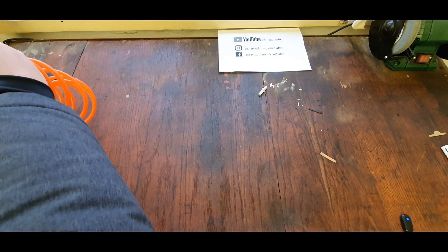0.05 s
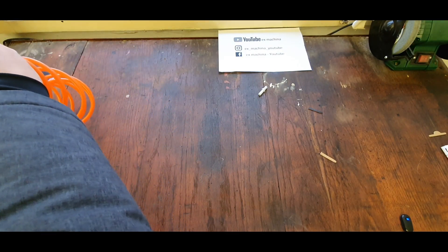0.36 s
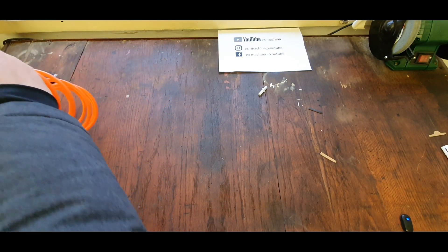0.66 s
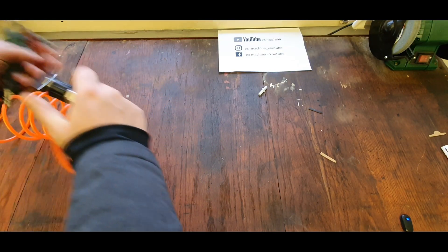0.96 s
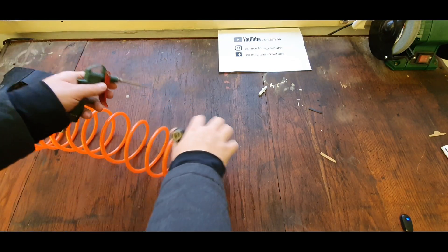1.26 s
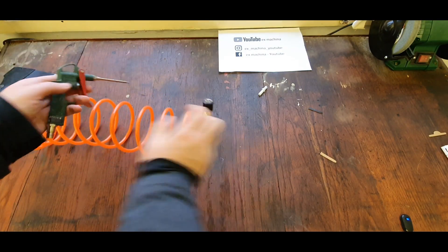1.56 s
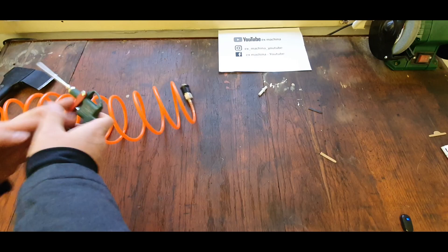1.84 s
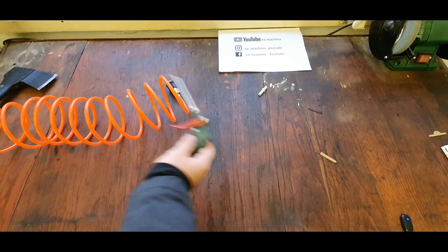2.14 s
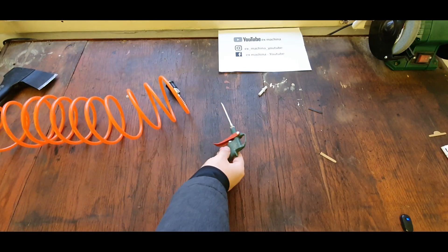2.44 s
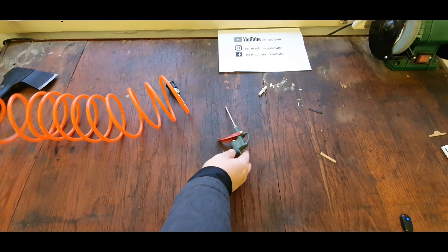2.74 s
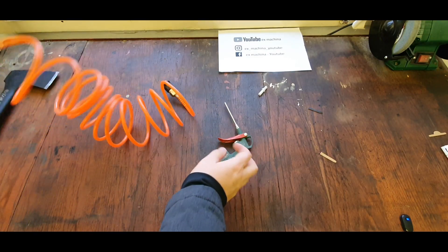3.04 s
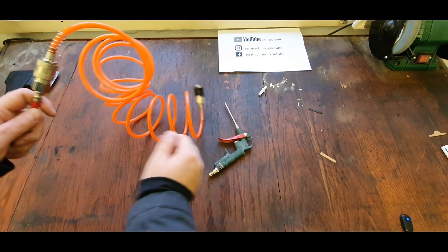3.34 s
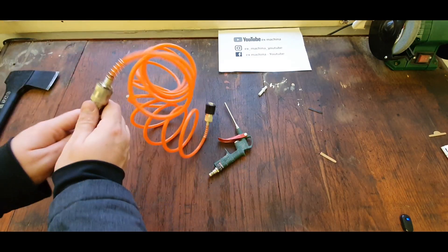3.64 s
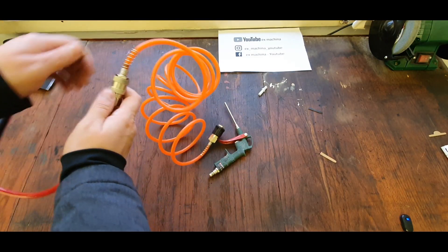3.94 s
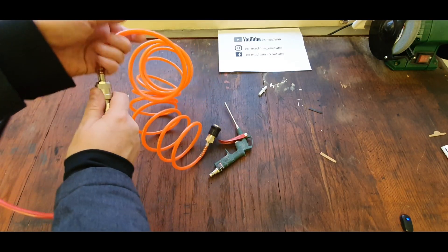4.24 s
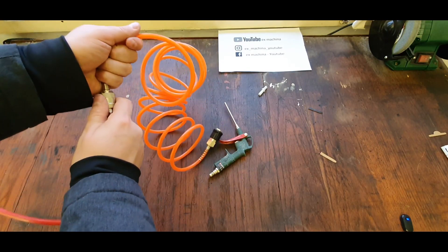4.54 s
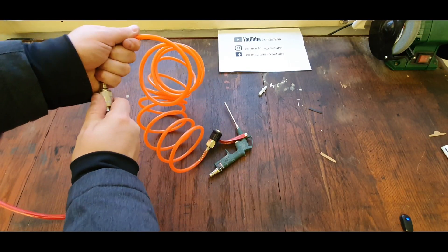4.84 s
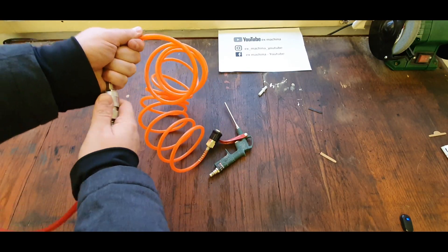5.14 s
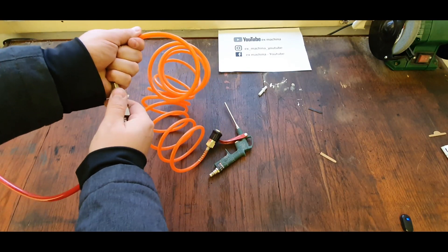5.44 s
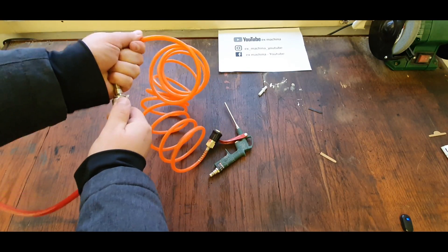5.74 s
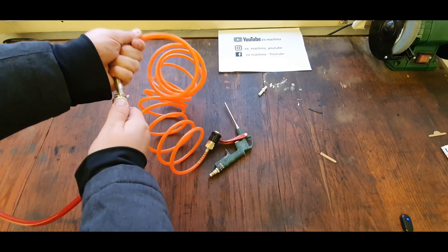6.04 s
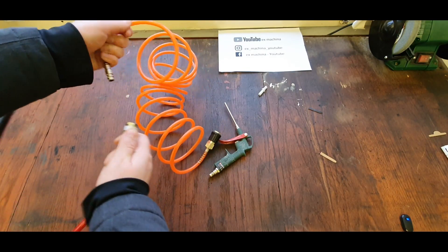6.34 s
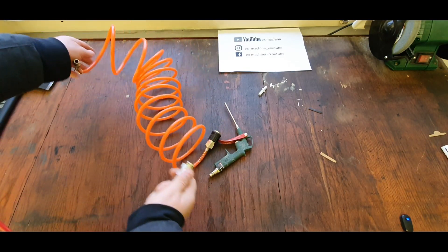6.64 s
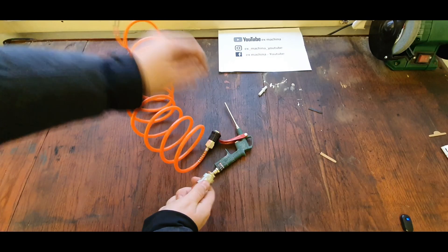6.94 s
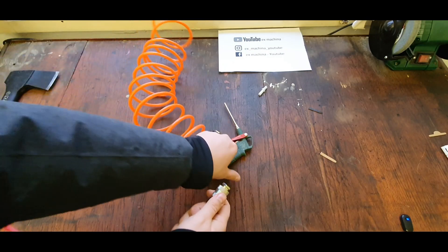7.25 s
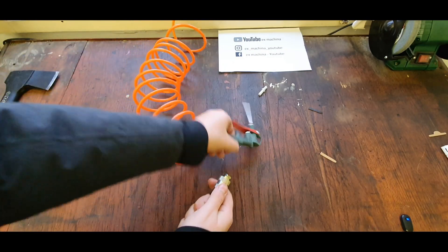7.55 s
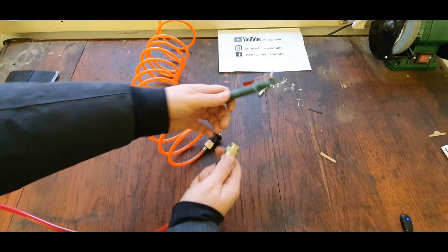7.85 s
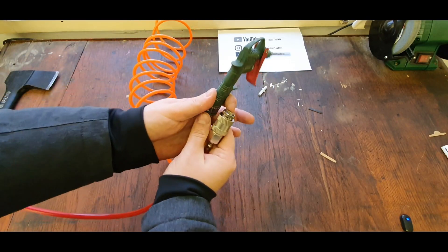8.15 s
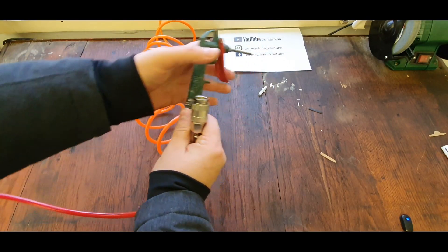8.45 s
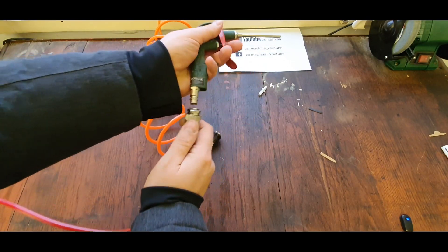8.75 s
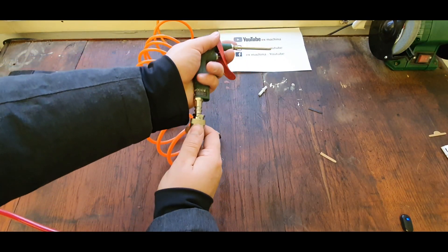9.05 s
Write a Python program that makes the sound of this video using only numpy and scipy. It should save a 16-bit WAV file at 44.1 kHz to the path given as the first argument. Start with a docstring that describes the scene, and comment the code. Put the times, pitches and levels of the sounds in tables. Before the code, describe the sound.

A short air hiss, a tool and hose knocking on wood, a sudden blast from an uncoupled air line, then small metallic clicks.

```python
"""A blow gun hisses and shuts, then is laid down with its coiled air hose on a wooden workbench.
Each knock is a low thump, a woody ring and a metal clack; the hose rumbles, scrapes and squeaks.
A brass quick coupler is pulled apart with a burst of turbulent air, then the gun is dragged up and
its steel plug rattles into the coupler. A faint hiss swells and sinks; the workshop is small and live."""
import sys
import numpy as np
from scipy import signal
from scipy.fft import rfft, irfft, next_fast_len
from scipy.io import wavfile
from scipy.ndimage import uniform_filter1d

SR = 44100
rng = np.random.default_rng(int(sys.argv[2]) if len(sys.argv) > 2 else 0)


def transcribe(signal):
    """Save signal, clipped to [-1, 1], as a 16-bit WAV file at the path in sys.argv[1]."""
    frames = np.atleast_2d(signal).T
    limited = np.clip(frames, -1, 1)
    pcm = np.round(limited * 32767).astype(np.int16)
    wavfile.write(sys.argv[1], SR, pcm)


N = 405279
TIME = np.arange(N) / SR
AGE = np.arange(SR * 3 // 4) / SR  # seconds since a hit

# knocks of gun, hose and fittings, including the valve shutting and the coupler popping open:
# start_s, level_db, weight_db, hardness_db
# weight lifts the thump; hardness lifts the clack, and the tick and snap twice as far
KNOCK_HITS = [(0.351, -34.5, -11, 3.5), (0.988, -54, 2, 1.5), (1.076, -45.5, -1.5, 1.5),
              (1.207, -48.5, 4, 2.5), (1.309, -40.5, -3, -1.5), (1.67, -20.5, -6.5, -11.5),
              (1.726, -32.5, -1, -3), (1.862, -33.5, -15, -17), (1.975, -36, -4, -20.5),
              (2.455, -35.5, -17, 2), (2.478, -38.5, -0.5, 3.5), (2.538, -40.5, -0.5, 0),
              (2.704, -32, -9.5, -11.5), (2.804, -23.5, -20, -13), (2.816, -13, -6, -1.5),
              (2.834, -35, -9, 7.5), (3.048, -10.5, -6.5, -6), (3.058, -16, -11, -10.5),
              (3.119, -22, 6, -1.5), (3.169, -19.5, -10, -7.5), (3.767, -33.5, 0.5, 1),
              (4.303, -29.5, -7, -15.5), (4.517, -46.5, -4.5, -6.5), (5.351, -61, -2, -1.5),
              (5.602, -27.5, -15.5, 4), (6.285, -57, -4, -8), (6.455, -54, 3.5, -17.5),
              (6.544, -52, 2, -5.5), (6.897, -46.5, 1, -1), (6.941, -34, -8, 2), (7.418, -35.5, -3.5, 4.5),
              (7.587, -55.5, 0.5, 9), (7.637, -36, -6.5, -25), (7.993, -49.5, -3, -6)]
# the bright snap on top of a knock or click: freq_hz, level_db
SNAP_SPECTRUM = [(5000, -34), (8000, -3), (10800, -4), (12800, 3.5), (16000, -5.5)]


def amp(db):
    """Decibels to gain."""
    return 10 ** (np.asarray(db) / 20)


def unit(x):
    """Scale to rms 1."""
    return x / np.sqrt(np.mean(x ** 2) + 1e-20)


def struck(x, size=900):
    """Scale a hit so that its first size samples have rms 1."""
    return x / np.sqrt(np.mean(x[..., :size] ** 2))


def placed(x, pan_db):
    """Pan a stereo sound: positive is left, negative is right."""
    return x * amp([[pan_db / 2], [-pan_db / 2]])


def add(track, start_s, sound):
    """Mix a sound into a stereo track."""
    start = max(round(start_s * SR), 0)
    track[:, start:start + sound.shape[-1]] += sound[..., :N - start]


def along(points, hz):
    """Read a curve of (freq_hz, value) points on a log frequency axis."""
    freqs, values = np.transpose(points)
    return np.interp(np.log(hz + 1), np.log(freqs + 1), values)


def filtered(x, response):
    """EQ x with a gain given as a function of frequency."""
    padded = next_fast_len(x.shape[-1] + SR // 10)
    gain = response(np.fft.rfftfreq(padded, 1 / SR))
    return irfft(rfft(x, padded) * gain, padded)[..., :x.shape[-1]]


def colour(x, spectrum):
    """Minimum-phase EQ through (freq_hz, level_db) points, returned at rms 1."""
    size = x.shape[-1]
    padded = 2 * next_fast_len(size // 2 + SR // 10)
    gain = amp(along(spectrum, np.fft.rfftfreq(padded, 1 / SR)))
    cepstrum = irfft(np.log(gain))
    cepstrum[1:padded // 2] *= 2  # folded forward, so nothing rings ahead of a hit
    cepstrum[padded // 2 + 1:] = 0
    return unit(irfft(rfft(x, padded) * np.exp(rfft(cepstrum)), padded)[..., :size])


def fade(t60_s):
    """Free decay after a hit."""
    return 10 ** (-3 * AGE / t60_s)


def stroke(start_s, length_s, attack_s, release_s):
    """Envelope of one movement: it builds, holds and dies away."""
    age = TIME - start_s
    return np.clip(age / attack_s, 0, 1) * np.exp(-np.maximum(age - length_s, 0) / release_s)


def dying(start_s, db, db_per_s):
    """Envelope that jumps to db and falls at a steady rate."""
    age = TIME - start_s
    return (age >= 0) * amp(db - db_per_s * np.abs(age))


def ring(modes, scatter_db):
    """A body struck at a new spot: each mode gets a new strength and sign."""
    out = np.zeros(len(AGE))
    for hz, db, t60_s in modes:
        strength = rng.choice([-1, 1]) * amp(db + scatter_db * rng.standard_normal())
        out += strength * fade(t60_s) * np.sin(2 * np.pi * hz * AGE)
    return out


def burst(spectrum, t60_s, chatter_db):
    """One sharp contact and the chatter after it, coloured by the struck body."""
    chatter = rng.standard_normal(len(AGE)) * fade(t60_s)
    force = amp(chatter_db) * chatter / np.linalg.norm(chatter)
    force[0] += 1
    return colour(force, spectrum)


def slips(per_s, spread_db):
    """Stick-slip friction: tiny pushes of uneven size at random moments."""
    pushes = (rng.random(N) < per_s / SR) * rng.choice([-1, 1], N)
    return pushes * amp(spread_db * rng.standard_normal(N))


def diffuse(size):
    """White stereo noise from all sides: centred in the bass, wide in the treble."""
    # how alike left and right are in the room: freq_hz, correlation
    likeness = [(60, 0.98), (140, 0.97), (290, 0.9), (640, 0), (1400, 0), (5000, 0.017)]

    def mid_side_gains(hz):
        angle = np.arccos(np.clip(along(likeness, hz), -1, 1)) / 2
        return np.array([np.cos(angle), np.sin(angle)])

    mid, side = filtered(rng.standard_normal((2, size)), mid_side_gains)
    return np.array([mid + side, mid - side])


def workshop(x, wet_db, right_lag_samples=8):
    """Mono to stereo: the direct sound, the bounce off the bench and the room's dense tail."""
    # the room's reverb time: freq_hz, t60_s
    decay_times = [(100, 0.28), (300, 0.31), (700, 0.38), (1800, 0.41), (5000, 0.36), (9000, 0.33),
                   (15000, 0.32)]
    hz, t, bands = signal.stft(diffuse(len(AGE)), SR, nperseg=256)
    decay = amp(-60 * t / along(decay_times, hz)[:, None])
    tail = signal.istft(bands * decay, SR, nperseg=256)[1][:, :len(AGE)]
    tail *= 1 + 2.2 * np.exp(-AGE / 0.0011)  # the bench bounce
    paths = amp(wet_db) * tail / np.linalg.norm(tail[0])
    paths[0, 0] += 1
    paths[1, right_lag_samples] += 1
    return signal.fftconvolve(x[None], paths, axes=1)[:, :len(x)]


def room_tone_and_hiss():
    """A faint hiss swells and sinks, brighter when louder, over the rumble of the still room."""
    # hiss swells: peak_s, half_length_s, level_db
    hiss_swells = [(0.778, 0.28, -58.5), (1.19, 0.1, -52), (1.586, 0.16, -50.5), (1.867, 0.24, -56),
                   (2.32, 0.25, -53.5), (2.884, 0.3, -57), (3.548, 0.36, -57.5), (3.93, 0.19, -52.5),
                   (4.2, 0.25, -58), (4.933, 0.14, -64), (6.55, 0.13, -67), (7.28, 0.44, -64.5),
                   (7.85, 0.24, -60.5), (8.58, 0.08, -61.5)]
    # the hiss: freq_hz, level_db
    hiss_spectrum = [(200, -3), (600, -1.5), (2000, -1), (3100, 3.5), (4500, 0), (8200, 5.5), (9000, -2.5),
                     (16000, 0.5)]
    # the still room: freq_hz, level_db
    room_spectrum = [(15, -36), (25, -6), (70, -7), (153, -14), (714, -18.5), (962, -21.5), (1650, -18),
                     (2220, -28.5), (8140, -35.5), (16000, -39.5)]
    bright_spectrum = [(1000, -11), (3000, -5.5), (8000, 0), (9500, -3), (14000, 1.5)]
    bright_db = -48.5  # a swell this loud is half bright hiss
    swells = (amp(db) * np.exp(-((TIME - peak_s) / half_s) ** 2) for peak_s, half_s, db in hiss_swells)
    envelope = np.sqrt(sum(swell ** 2 for swell in swells))
    hiss = np.hypot(envelope, amp(-67.5)) * colour(diffuse(N), hiss_spectrum)
    bright_hiss = envelope ** 2 / amp(bright_db) * colour(diffuse(N), bright_spectrum)
    return hiss + bright_hiss + amp(-68) * colour(diffuse(N), room_spectrum)


def coil_rumble():
    """The springy coil rumbles on the bench while it is moved, and swings on after every knock."""
    # hands moving the hose: start_s, length_s, level_db
    moves = [(1.03, 0.87, -53.5), (2.115, 0.6, -59), (3.422, 0.12, -66), (3.663, 0.81, -51.5),
             (4.5, 0.73, -65), (6.397, 0.33, -62), (6.9, 0.65, -52.5)]
    # the coil on the bench: freq_hz, level_db
    rumble_spectrum = [(25, -28), (45, -13), (62, 2), (72, 0.5), (82, -13.5), (115, 4.5), (150, -1.5),
                       (185, -24.5), (225, -6.5), (290, -12), (400, -14.5), (700, -20.5), (1500, -25.5),
                       (4000, -53)]
    swing_db, swing_fall_db_per_s, rest_db = -13.5, 53.5, -75
    jolts = np.zeros(N)
    for start_s, db, weight_db, _ in KNOCK_HITS:
        jolts[round(start_s * SR)] = amp(db + weight_db + swing_db) ** 2
    swing_power = signal.lfilter([1], [1, -amp(-swing_fall_db_per_s / SR) ** 2], jolts)
    move_power = sum((amp(db) * stroke(start_s, length_s, attack_s=0.068, release_s=0.1)) ** 2
                     for start_s, length_s, db in moves)
    return np.sqrt(swing_power + move_power + amp(rest_db) ** 2) * colour(diffuse(N), rumble_spectrum)


def squeaks():
    """Rubbing hose and metal sing thin, wavering tones that sag as the rub slows."""
    # squeaking rubs: start_s, length_s, pitch_hz, level_db
    rubs = [(0.855, 0.021, 3150, -64), (1.243, 0.027, 1120, -51.5), (8.934, 0.062, 8220, -69.5)]
    sag_per_s, waver_depth = 0.48, 0.009  # shares of the pitch
    out = np.zeros(N)
    for start_s, length_s, hz, db in rubs:
        waver = waver_depth * unit(uniform_filter1d(rng.standard_normal(N), size=100))
        pitch_hz = hz * (np.exp(-sag_per_s * np.maximum(TIME - start_s, 0)) + waver)
        envelope = amp(db) * stroke(start_s, length_s, attack_s=0.017, release_s=0.01)
        out += envelope * np.sin(2 * np.pi * np.cumsum(pitch_hz) / SR)
    return workshop(out, wet_db=7)


def sliding():
    """Hose and gun judder over the boards, and their hard edges scrape."""
    # drags across the wood: start_s, length_s, judder_db, scrape_db
    drags = [(0.802, 0.14, -52, -61), (1.067, 0.27, -46.5, -44.5), (2.403, 0.03, -57, -60),
             (2.442, 0.05, -53, -33), (2.668, 0.05, -32, -56), (3.052, 0.13, -21, -37),
             (6.253, 0.99, -63.5, -73), (6.969, 0.11, -44, -54), (7.255, 0.084, -25, -45),
             (7.446, 0.13, -42, -36), (8.396, 0.57, -64.5, -79)]
    judder_spectrum = [(120, -31), (200, -14.5), (280, -0.5), (420, -6), (560, -10), (680, -4),
                       (1000, -15.5), (2500, -37), (5000, -57)]
    scrape_spectrum = [(600, -18), (1200, -0.5), (2000, 1.5), (3500, -6), (7000, -20.5), (12000, -26)]
    judder = colour(slips(per_s=630, spread_db=2.5), judder_spectrum)
    scrape = colour(slips(per_s=5300, spread_db=9), scrape_spectrum)
    out = np.zeros(N)
    for start_s, length_s, judder_db, scrape_db in drags:
        envelope = stroke(start_s, length_s, attack_s=0.051, release_s=0.028)
        out += envelope * (amp(judder_db) * judder + amp(scrape_db) * scrape)
    return amp(-10) * workshop(out, wet_db=3.5)


def plug_and_socket():
    """The hollow steel plug rings on the brass socket; pulling the sleeve and pushing the plug grind."""
    # the plug touching the socket: start_s, plug_db, sleeve_db
    clinks = [(5.6096, -24, -20.5), (6.942, -32, -35), (8.7023, -31, -23.5), (8.7151, -36, -45),
              (8.8884, -33, -55), (8.961, -38.5, -56), (8.976, -51.5, -61), (9.0238, -48.5, -52.5),
              (9.0758, -40, -45), (9.0915, -39, -42), (9.1, -35.5, -48.5), (9.124, -32.5, -38.5)]
    # the plug's ring: pitch_hz, level_db, t60_s
    plug_modes = [(1910, -15, 0.15), (2900, -5, 0.11), (3030, -11, 0.086), (3120, -5, 0.17),
                  (3280, -1, 0.14), (3070, -7.5, 0.13)]
    # contact with the socket: freq_hz, level_db
    socket_spectrum = [(700, -40.5), (1400, -27.5), (1580, -19), (2100, -20), (2750, -4.5), (3050, 9),
                       (3350, -9.5), (4000, -20.5), (6000, -46.5)]
    # the coupler's brighter sleeve: freq_hz, level_db
    sleeve_spectrum = [(2500, -41.5), (4300, -5.5), (4820, -3.5), (5200, -3), (5700, 4), (6500, -6),
                       (7400, -5), (8500, -16.5), (12000, -24)]
    pull_spectrum = [(1200, -11.5), (3000, 3), (4500, -6), (6500, -10), (10000, -19.5)]
    out = np.zeros((2, N))
    for start_s, plug_db, sleeve_db in clinks:
        steel = amp(-9.5) * struck(ring(plug_modes, scatter_db=6.5))
        steel += struck(burst(socket_spectrum, t60_s=0.015, chatter_db=-7.5))
        plug = amp(plug_db - 2) * struck(workshop(steel, wet_db=-2.5))
        brass = burst(sleeve_spectrum, t60_s=0.013, chatter_db=2.5)
        sleeve = amp(sleeve_db - 11.5) * struck(workshop(brass, wet_db=-2.5))
        add(out, start_s, placed(plug + sleeve, pan_db=-2.5))
    rub = slips(per_s=400, spread_db=6)
    push_grit = colour(rub, socket_spectrum) + amp(-11) * colour(rub, sleeve_spectrum)
    pull_grit = colour(slips(per_s=1800, spread_db=5.5), pull_spectrum)
    sleeve_pull = amp(-58) * stroke(start_s=4.485, length_s=0.0444, attack_s=0.0059, release_s=0.055)
    plug_push = amp(-43.5) * stroke(start_s=9.08, length_s=0.053, attack_s=0.034, release_s=0.016)
    return out + workshop(sleeve_pull * pull_grit + plug_push * push_grit, wet_db=4.5)


def metal_clicks():
    """Sprung sleeve, locking balls and trigger snap on metal; bright clicks trade tick for snap."""
    # small parts in the coupler and gun: start_s, level_db, brightness_db
    clicks = [(1.942, -49.5, 4), (2.48, -40, 6), (2.8165, -23, 18), (2.826, -33, 16), (2.857, -41, 16),
              (3.048, -19.5, -5), (3.177, -36.5, 14), (3.768, -37.5, 5), (4.6543, -46, 2.5),
              (4.767, -57.5, -0.5), (6.003, -48.5, 1), (6.0175, -33, 13), (6.0291, -47, 14),
              (6.042, -48, 13), (6.124, -64, 1), (7.4185, -36, -3), (7.589, -34, 5), (8.0485, -48, -3),
              (8.3817, -44.5, -2), (8.3914, -49, 12), (8.4533, -48, 2), (8.4654, -47.5, 13.5),
              (8.684, -36, 14)]
    # the dull part of a click: freq_hz, level_db
    tick_spectrum = [(600, -14), (1500, -8.5), (3000, -0.5), (4500, -4), (7000, -25)]
    # the bright part of a click: freq_hz, level_db
    sleeve_spectrum = [(3000, -30.5), (5000, -5.5), (6000, -1), (7400, 0), (8600, -10.5), (12000, -27.5)]
    out = np.zeros((2, N))
    for start_s, db, bright_db in clicks:
        tick = burst(tick_spectrum, t60_s=0.012, chatter_db=-8)
        sleeve = burst(sleeve_spectrum, t60_s=0.01, chatter_db=-2)
        snap = burst(SNAP_SPECTRUM, t60_s=0.008, chatter_db=-2)
        click = (amp(-bright_db - 8) * struck(workshop(tick, wet_db=3))
                 + amp(-7.5) * struck(workshop(sleeve, wet_db=-1))
                 + amp(0.35 * bright_db - 14.5) * struck(workshop(snap, wet_db=1)))
        add(out, start_s, amp(db) * placed(click, pan_db=1))
    return out


def air_jets():
    """Turbulent jets: the gun's nozzle until its valve shuts, then the hose emptying at the coupler."""
    # air through the nozzle: freq_hz, level_db
    jet_spectrum = [(100, -55), (210, -35), (380, -21.5), (910, -19.5), (2750, -8), (4770, -7.5),
                    (8300, -2.5), (9200, -5.5), (13500, 0), (16000, -0.5)]
    # air through the open coupler: freq_hz, level_db
    vent_spectrum = [(100, -9), (450, -12.5), (1270, -16), (1950, -10), (3140, -2), (4200, -4), (6200, 0.5),
                     (9200, -3), (12500, 2), (16000, 1.5)]
    settle_s, shut_s = 0.042, 0.35
    vent_s, rise_s, empty_s = 5.602, 0.004, 5.94
    valve = np.clip((shut_s - TIME) / 0.0028, 0, 1)
    surge_db = 9 * np.exp(-TIME / settle_s)
    jet = valve * amp(surge_db - 32.5) * colour(rng.standard_normal(N), jet_spectrum)
    # the coupler lets go one big rush, and the rest drains from the coil
    blast_db = -16.5
    opening = (TIME < vent_s) * amp(blast_db) * np.exp(-np.abs(TIME - vent_s) / rise_s)
    blast = dying(vent_s, blast_db, db_per_s=267)
    leak = dying(vent_s, db=-38, db_per_s=51) * stroke(vent_s, empty_s - vent_s, rise_s, release_s=0.022)
    vent = (opening + np.hypot(blast, leak)) * colour(rng.standard_normal(N), vent_spectrum)
    out = workshop(jet, wet_db=6.5, right_lag_samples=22) + workshop(vent, wet_db=7, right_lag_samples=15)
    # the freed air pushes a low puff against each microphone port
    puff_spectrum = [(20, -18), (45, 4.5), (85, -5), (140, -6), (400, -37)]
    puff = colour(rng.standard_normal((2, len(AGE))), puff_spectrum)
    swell = np.exp(-((AGE - 0.035) / 0.024) ** 2)
    add(out, 5.597, amp(-31.5) * unit(puff + puff.mean(axis=0)) * swell)
    return out


def knocks():
    """Each knock layers a frame thump, a woody ring and rattling metal; harder ones are brighter."""
    # the bench frame: pitch_hz, level_db, t60_s
    frame_modes = [(58.7, -13.5, 1), (75, -8.5, 1), (97.4, -6, .5), (110.3, 4, 0.3), (130.25, -4, .45),
                   (151.8, -1, 0.36)]
    # the wooden top: pitch_hz, level_db, t60_s
    board_modes = [(224, -11.5, 0.62), (277.2, -3.5, 0.26), (331.5, -1, 0.16), (345, -6.5, 0.23),
                   (428, -2, 0.091), (492, -4.5, 0.085), (660.4, -5.5, 0.32), (725, -3, 0.081),
                   (816, -3, 0.1)]
    # the gun's body: pitch_hz, level_db, t60_s
    gun_modes = [(1033, -2.5, 0.15), (1330, -4, 0.12), (1290, -7, 0.17), (1413, 3.5, 0.087),
                 (1483, -3, 0.14), (1550, -4, 0.08), (1894, -3, 0.14)]
    # its steel nozzle and trigger: pitch_hz, level_db, t60_s
    nozzle_modes = [(2860, -6, 0.25), (3400, -2.5, 0.15), (3480, -3, 0.3), (3850, -2, 0.23),
                    (4350, -0.5, 0.17), (4540, 0.5, 0.21), (5120, -5.5, 0.22), (6255, -8, 0.2)]
    # the body's midrange clack: freq_hz, level_db
    clack_spectrum = [(400, -28.5), (800, -5.5), (1030, -3), (1130, 2), (1260, 2.5), (1420, -5.5),
                      (1600, -1.5), (2200, -8.5), (3000, -11.5), (6000, -54.5)]
    # the steel's high tick: freq_hz, level_db
    tick_spectrum = [(1200, -38), (2300, -2.5), (3400, 1.5), (3900, -1), (4400, 0), (5400, -3.5),
                     (6500, -9), (8000, -12.5), (10000, -23), (16000, -44.5)]
    wood_spectrum = [(120, -28), (280, 6), (800, -2), (1200, -16), (3000, -53.5)]
    out = np.zeros((2, N))
    for start_s, db, weight_db, hard_db in KNOCK_HITS:
        frame = ring(frame_modes, scatter_db=-0.5)
        thump = amp(weight_db - 4) * struck(workshop(frame, wet_db=-8.5))
        wood = struck(ring(board_modes, scatter_db=4))
        wood += amp(2.5) * struck(burst(wood_spectrum, t60_s=0.15, chatter_db=0.5))
        board = amp(-4) * struck(workshop(wood, wet_db=1))
        body = amp(-6) * struck(ring(gun_modes, scatter_db=2.5))
        body += struck(burst(clack_spectrum, t60_s=0.046, chatter_db=-6))
        clack = amp(hard_db - 3) * struck(workshop(body, wet_db=13.5))
        steel = amp(-11) * struck(ring(nozzle_modes, scatter_db=4.5))
        steel += struck(burst(tick_spectrum, t60_s=0.019, chatter_db=-4))
        tick = amp(2 * hard_db - 6.5) * struck(workshop(steel, wet_db=7))
        contact = burst(SNAP_SPECTRUM, t60_s=0.012, chatter_db=5.5)
        snap = amp(2 * hard_db - 23) * struck(workshop(contact, wet_db=7.5))
        add(out, start_s, amp(db) * (thump + placed(board + clack, pan_db=-1.43) + tick + snap))
    return out


def scene():
    """Everything at the workbench, in stereo."""
    handling = knocks() + metal_clicks() + plug_and_socket() + squeaks() + sliding()
    return handling + air_jets() + coil_rumble() + room_tone_and_hiss()


def record(dry):
    """The microphone sheds the deepest bass and rounds the hardest peaks; the recorder cuts the top."""
    low_hz, top_hz, ceiling = 48, 16000, 0.9
    low_cut = filtered(dry, lambda hz: hz ** 2 / (hz ** 2 - low_hz ** 2 - 1j * hz * low_hz))
    rounded = low_cut / (1 + (low_cut / ceiling) ** 4) ** (1 / 4)
    return filtered(rounded, lambda hz: 1 / (1 + (hz / top_hz) ** 160))


dry = scene()
out = record(dry)
transcribe(out)
```